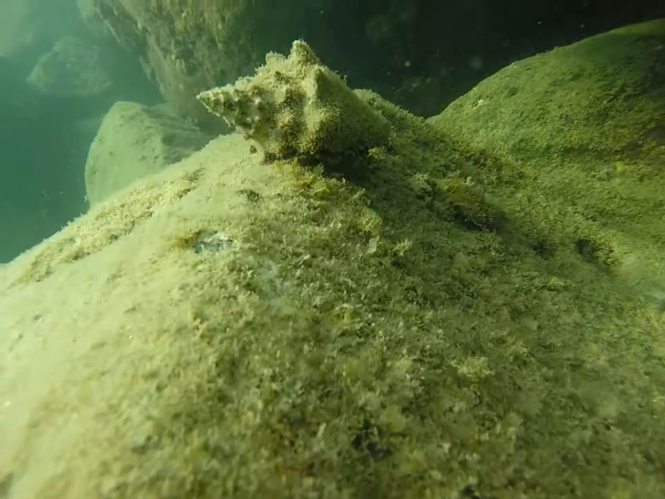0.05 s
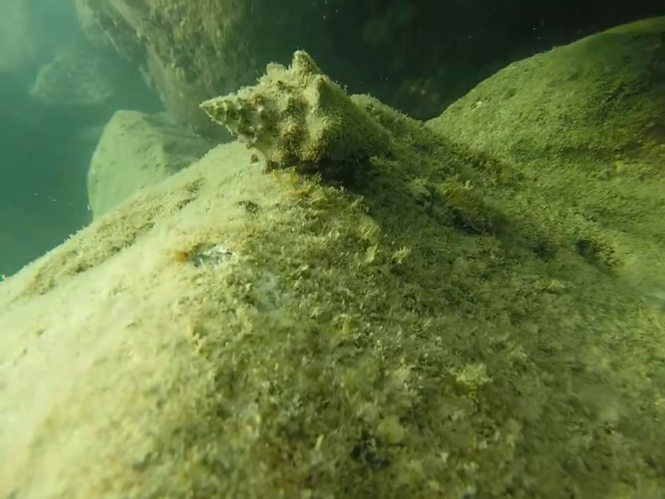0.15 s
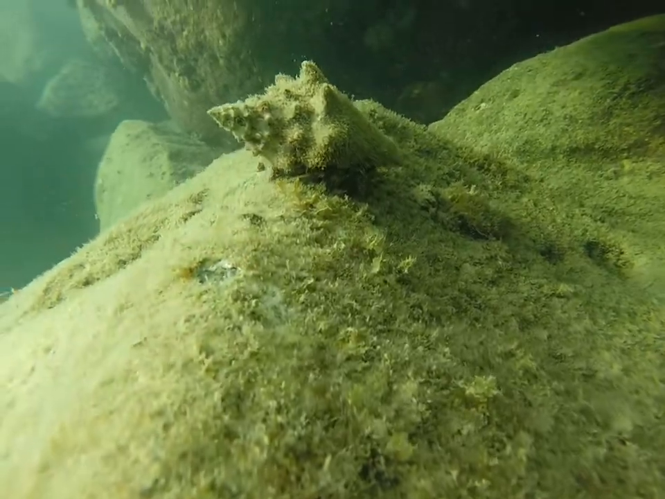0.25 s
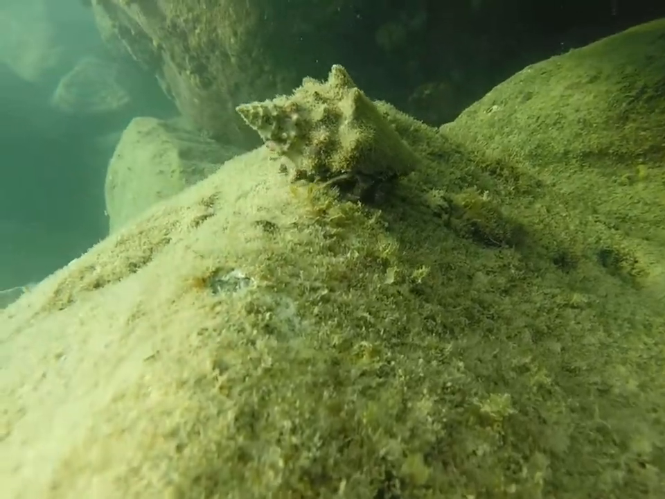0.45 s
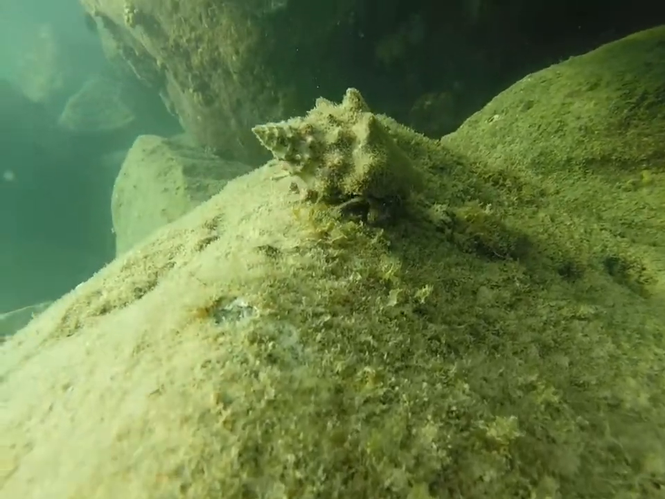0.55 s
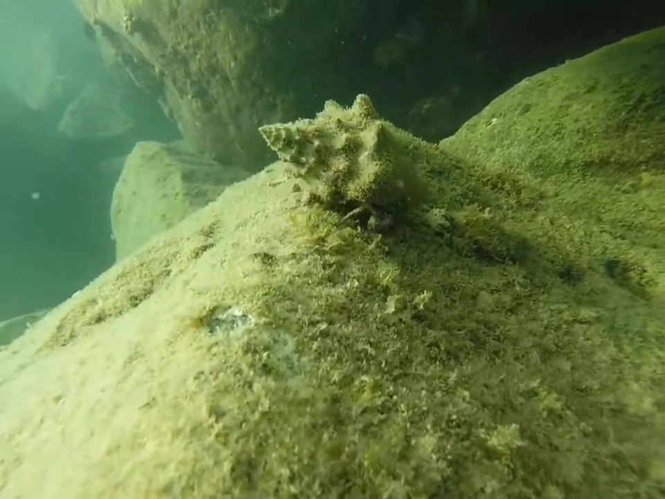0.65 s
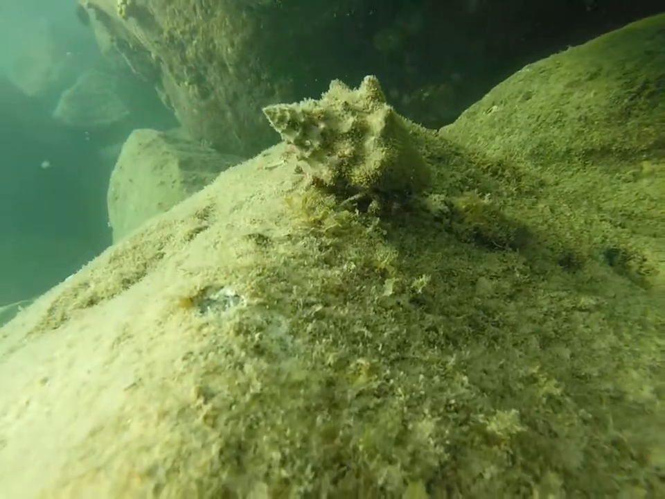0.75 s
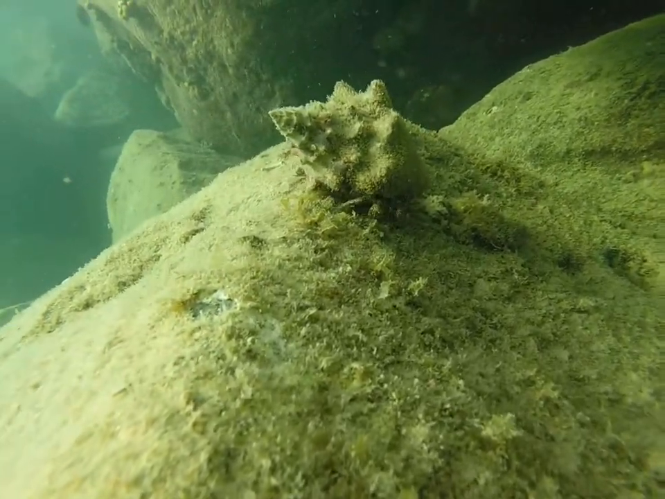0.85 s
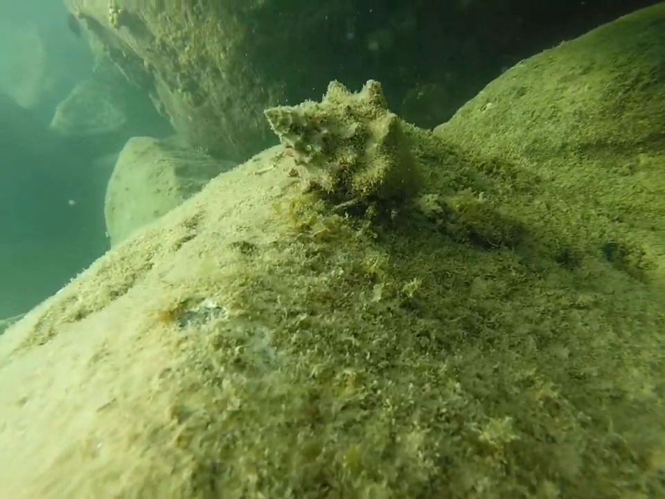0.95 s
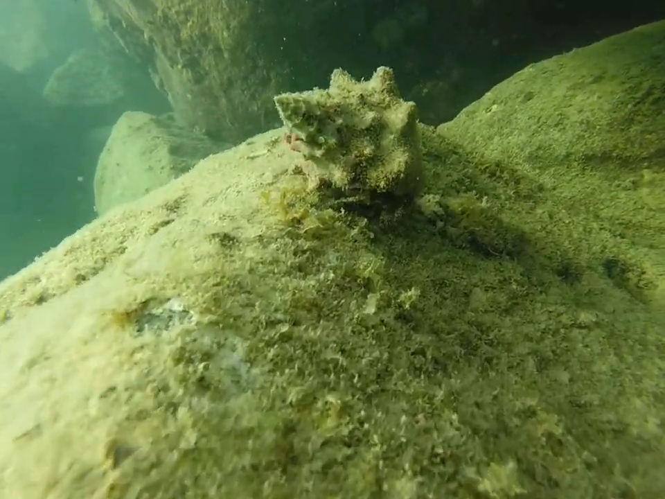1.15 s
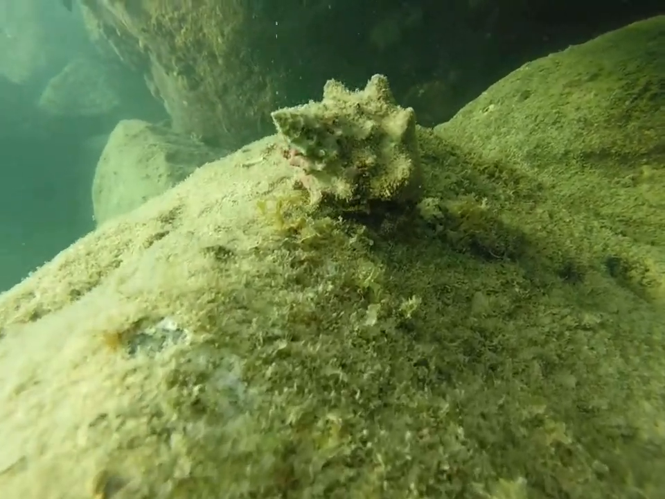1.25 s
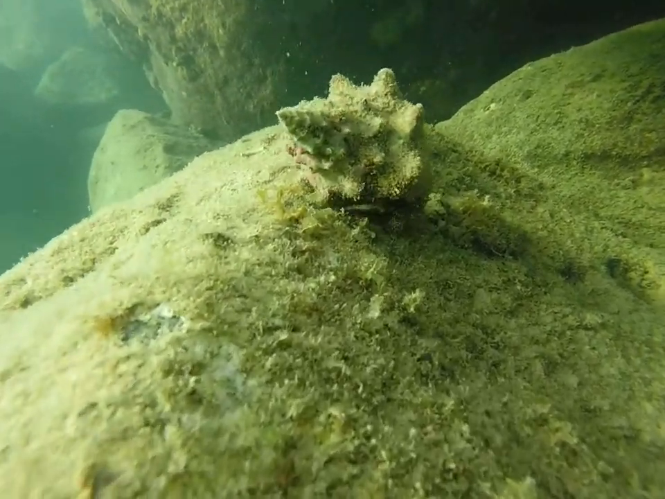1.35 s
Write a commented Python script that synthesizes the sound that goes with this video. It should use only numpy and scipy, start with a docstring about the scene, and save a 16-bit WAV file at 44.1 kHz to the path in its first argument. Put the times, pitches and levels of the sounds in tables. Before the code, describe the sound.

A shell knocks dully on a rock underwater, with small clicks and faint crackle.

```python
"""A conch shell rocks on a boulder under shallow water, heard from inside a camera housing.
Two dull knocks, soft bumps and bubble-like blips of water ring the housing; the shell's hard lip clacks.
Sharp snaps, probably shrimp and grit, ring the housing's wall, and sand grinds softly now and then.
Behind them lie a fine crackle of distant snaps and the faint rumble and burble of moving water."""
import sys
import numpy as np
from scipy import signal
from scipy.fft import rfft, irfft, next_fast_len
from scipy.io import wavfile

SR = 44100
rng = np.random.default_rng(int(sys.argv[2]) if len(sys.argv) > 2 else 0)


def unload_audio(sound):
    """Save the sound as a 16-bit wav file, at the path given as the first command line argument."""
    columns = np.transpose(np.atleast_2d(sound))
    # keep every value between -1 and 1, then stretch to whole-number steps
    steps = np.round(np.clip(columns, -1, 1) * 32767)
    wavfile.write(sys.argv[1], SR, steps.astype(np.int16))


N = 61739
T = np.arange(N) / SR

# dull knocks, soft bumps and bubble-like blips of water:
# (time [s], level [dB], pitch [Hz], attack [s], housing drive [dB])
KNOCKS_AND_BLIPS = [(.071, -47, 252.7, 0.0032, -52.5), (0.129, -33.5, 336, .004, -61),
                    (.160, -39, 620, 0.0034, -66), (0.2405, -13, 306.3, 0.0063, -21.5),
                    (0.2493, -20.5, 323, 0.0051, -40), (0.263, -29, 146, 0.0065, -63),
                    (0.2791, -27.5, 244, 0.0038, -34), (.289, -28.5, 269, 0.008, -35),
                    (.302, -35, 290, 0.0074, -41.5), (0.3257, -25, 544, .004, -27),
                    (.329, -23.5, 132, 0.013, -53), (0.3282, -11.5, 211.8, .012, -35.5),
                    (.344, -17.5, 355, 0.0037, -28), (.364, -28, 191, 0.0078, -40),
                    (0.4496, -25, 606, 0.0039, -51.5), (.469, -39, 620, 0.0028, -68),
                    (.518, -44, 600, 0.0041, -73), (.587, -42.5, 524, .008, -53.5),
                    (.617, -39.5, 574, 0.0027, -71), (0.659, -39.5, 154, 0.0043, -56),
                    (.668, -41, 588, 0.004, -61), (.683, -39, 596, 0.0049, -58),
                    (0.75, -30, 294, 0.0016, -49), (.772, -33, 319, 0.0045, -64),
                    (.784, -33.5, 354, 0.0044, -56), (0.798, -39, 325, 0.0054, -64),
                    (.824, -42.5, 580, 0.0034, -52), (.848, -41.5, 590, 0.0068, -75),
                    (.865, -43, 528, 0.0035, -55.5), (.882, -31, 139, 0.0044, -60),
                    (.907, -37, 163, 0.0047, -78), (1.101, -37.5, 354, 0.0072, -64),
                    (1.193, -47, 572, 0.005, -57), (1.237, -41.5, 355, 0.0031, -58),
                    (1.366, -37.5, 297, 0.0063, -73)]
# the housing's boxy low modes: (frequency [Hz], gain [dB], decay to -60 dB [s])
HOUSING_MODES = [(133, -4, 0.068), (221, 3, 0.055), (342, -6.5, 0.097), (448, 6, 0.031), (606, -8, 0.039),
                 (660, -8, 0.03), (773, -2, 0.036), (910, -11.5, 0.045)]


def knocks_and_blips():
    """Each knock, bump or water blip swells and dies within a few cycles; its onset rings the housing."""
    tones, onsets = np.zeros(N), np.zeros(N)
    for start, db, hz, attack_s, drive_db in KNOCKS_AND_BLIPS:
        age = np.maximum(T - start, 0)
        tones += from_db(db) * swell(age, attack_s, shape=2.83) * np.sin(2 * np.pi * hz * age)
        onsets[int(start * SR)] += from_db(drive_db)
    body = sum((-1) ** k * from_db(db) * ring(onsets, hz, t60)   # modes alternate in polarity
               for k, (hz, db, t60) in enumerate(HOUSING_MODES))
    dull_body = cut(body, 955, "low", order=8)
    return cut(tones + dull_body, 91, "high", order=2)


# hard shell-on-rock clacks: (time [s], level [dB], pitch [Hz], attack [s])
CLACKS = [(.051, -45.5, 1480, 0.0033), (0.2403, -43, 1490, 0.0022), (.3293, -20.5, 2970, 0.0011),
          (.5192, -43, 1700, 0.002), (0.8245, -25, 3220, 0.0014)]
# the shell's partials: (frequency [ratio to pitch], gain [dB])
SHELL_PARTIALS = [(.48, -25), (.85, -15.5), (0.998, -1), (1.32, -16)]


def shell_clacks():
    """The shell's hard lip meets the rock and rings for a few milliseconds."""
    clacks = np.zeros(N)
    for start, db, hz, attack_s in CLACKS:
        age = np.maximum(T - start, 0)
        tone = sum(from_db(partial_db) * np.sin(2 * np.pi * hz * ratio * age)
                   for ratio, partial_db in SHELL_PARTIALS)
        clacks += from_db(db) * swell(age, attack_s, shape=1.74) * tone
    return clacks


# close snaps and how hard they drive each register of the wall:
# (time [s], tap [dB], ring [dB], crack [dB], sizzle [dB], decay [s])
SNAPS = [(0.024, -52.5, -55.5, -60.5, -63, 0.0013), (0.0486, -69, -54, -72, -78, 0.0026),
         (.0992, -59, -57, -71, -82, 0.0017), (.126, -75, -56, -68, -62.5, .0015),
         (0.1876, -60, -49.5, -67, -51.5, 0.0015), (0.2035, -64, -46.5, -50, -54.5, 0.00021),
         (0.237, -58, -49, -67, -68, 0.0018), (0.2808, -53.5, -50, -68, -61, 0.0028),
         (0.297, -54, -55, -56, -62, 0.0043), (0.3285, -49, -33, -43, -43.5, 0.00072),
         (0.353, -51.5, -53, -68, -84, 0.0018), (0.3588, -63, -53, -64, -69, 0.0011),
         (0.3711, -55, -45, -44, -48, 0.001), (0.4, -57.5, -47, -71, -66, 0.00076),
         (0.422, -78, -57.5, -57, -62, 0.0021), (0.49, -67, -57.5, -57.5, -50, 0.00059),
         (0.535, -71, -53, -64, -68, .0022), (0.549, -51, -53, -60.5, -62.5, 0.0022),
         (0.616, -62, -59, -58, -71, 0.0025), (0.725, -59, -53, -50.5, -61, 0.0032),
         (0.8255, -43.5, -38, -51, -52.5, 0.0011), (0.897, -53.5, -51.5, -62, -65, 0.0042),
         (0.9702, -53.5, -49.5, -58, -72, 0.0043), (1.051, -86, -59, -57.5, -70, 0.0046),
         (1.107, -59, -66, -58, -58.5, 0.0033), (1.156, -81, -70, -66, -60, 0.00049),
         (1.278, -73, -54, -71, -64, 0.0015), (1.2958, -54.5, -50, -60, -65.5, 0.0024),
         (1.33, -53.5, -50.5, -47, -59.5, .0018), (1.348, -63, -54.5, -63, -78, 0.0019)]
# the wall's high modes, from hollow tap to bright sizzle: (frequency [Hz], width [Hz], gain [dB])
TAP_MODES = [(1514, 75, 0), (1730, 120, -1.5), (2190, 200, -2)]
RING_MODES = [(2690, 82, -0.5), (2967, 250, 0), (3217, 98, -3)]
CRACK_MODES = [(4266, 130, 7.5), (4923, 410, 2.5), (5940, 540, -4.5)]
SIZZLE_MODES = [(7300, 490, 5), (8150, 1000, 0), (9100, 300, -8), (10200, 590, -18.5), (12000, 1100, -17)]


def snaps():
    """Each snap is a tight pulse with a tail of scatter off the rocks; it rings four wall registers."""
    tail_db, tail_decay_s = -25.5, 0.013
    drives = np.zeros((4, N))
    for start, *drives_db, decay_s in SNAPS:
        age = np.maximum(T - start, 0)
        attack = np.sqrt(np.minimum(age / decay_s, 1))
        tail = from_db(tail_db) * np.exp(-age / tail_decay_s)
        pulse = attack * (np.exp(-age / decay_s) + tail)
        pulse /= np.sqrt(np.sum(pulse ** 2) / (.01 * SR))   # the energy of 10 ms at unit power
        drives += np.outer(from_db(drives_db), pulse)
    polarities = rng.choice([-1., 1.], (4, N))
    registers = (TAP_MODES, RING_MODES, CRACK_MODES, SIZZLE_MODES)
    return sum(housing_wall(drive, modes) for drive, modes in zip(drives * polarities, registers))


# soft scrapes of sand: (time [s], length [s], level [dB])
SCRAPES = [(0.526, 0.015, -54), (1.055, 0.022, -56), (1.24, 0.077, -78)]


def sand_scrapes():
    """Sand grinds in brief arcs of grainy noise that ring the wall softly."""
    envelope = np.zeros(N)
    for start, length_s, db in SCRAPES:
        position = 2 * (T - start) / length_s - 1   # -1 to 1 across the scrape
        envelope += from_db(db) * np.sqrt(np.maximum(1 - position ** 2, 0))
    grains = rng.laplace(0, np.sqrt(.5), N)
    return housing_wall(envelope * grains, RING_MODES)


# EQ curves of the distant crackle and its even hiss: (frequency [Hz], gain [dB])
CRACKLE_EQ = [(1000, 1), (1500, 8), (2000, 5), (2900, 6), (3700, -0.5), (5500, 7), (8000, 2), (11000, -2),
              (13500, -20), (15500, -35)]
HISS_EQ = [(700, 5), (1000, 4.5), (1250, 0), (1600, 1.5), (2000, -2), (2700, 1.5), (3600, -4.5),
           (5000, -4.5), (6500, -11), (7800, -3), (10000, -17.5), (13500, -18.5), (15500, -33)]
# where the hiss rings in the wall: (frequency [Hz], width [Hz], level [dB])
WALL_TONES = [(3223, 120, -61.5), (4046, 74, -68)]


def far_crackle():
    """Distant snaps, each smeared by its path; the farthest merge into a hiss that rings in the wall."""
    snaps_per_s, spread_db, smear_s = 260, 3.0, 0.0011
    crackle_db, hiss_db = -63.5, -57.5
    sizes = from_db(spread_db * np.minimum(rng.exponential(1, N), 3.5))
    triggers = rng.random(N) < snaps_per_s / SR
    power = signal.lfilter([1], [1, -np.exp(-1 / (smear_s * SR))], sizes ** 2 * triggers + 1e-18)
    grains = np.sqrt(power) * rng.standard_normal(N)
    crackle = unit_power(equalise(grains, CRACKLE_EQ))
    wall_tones = sum(from_db(db) * unit_power(resonance(rng.standard_normal(N), hz, width))
                     for hz, width, db in WALL_TONES)
    return from_db(crackle_db) * crackle + from_db(hiss_db) * noise(HISS_EQ) + wall_tones


# EQ curves of the water's deep rumble and its burble: (frequency [Hz], gain [dB])
RUMBLE_EQ = [(15, -6.5), (26, -5.5), (36, 3), (48, -14), (65, -17), (120, -24.5), (300, -69)]
BURBLE_EQ = [(80, 4.5), (160, 0.5), (300, 2.5), (430, -3.5), (580, 5.5), (700, -3), (900, -12.5),
             (1300, -46)]
# fader moves of the two water layers: (time [s], level [dB])
RUMBLE_FADER = [(0, -43), (.09, -41.5), (.18, -48), (.3, -40), (.42, -44), (.52, -40.5), (.68, -40.5),
                (.74, -48), (.86, -39.5), (.92, -41), (1.04, -41), (1.1, -46.5), (1.4, -44.5)]
BURBLE_FADER = [(0, -48.5), (.1, -55.5), (.19, -48), (.42, -54.5), (.55, -52), (.68, -54), (.73, -51.5),
                (.9, -51), (1.0, -63.5), (1.15, -56.5), (1.23, -53), (1.4, -53.5)]


def water():
    """Water sways against the housing and burbles around it."""
    rumble = fader(RUMBLE_FADER) * noise(RUMBLE_EQ)
    burble = fader(BURBLE_FADER) * noise(BURBLE_EQ)
    return rumble + burble


def housing_wall(drive, modes):
    """One register of the wall's high modes, ringing side by side at unit power gain."""
    skirt_ratio = 1.143   # the register rolls off this far beyond its outer modes
    band_hz = [modes[0][0] / skirt_ratio, min(modes[-1][0] * skirt_ratio, .45 * SR)]
    drive_and_click = np.stack([drive, signal.unit_impulse(N)])
    ringing = sum(from_db(db) * resonance(drive_and_click, hz, width) for hz, width, db in modes)
    sound, click_response = cut(ringing, band_hz, "band", order=2)
    return sound / np.sqrt(np.sum(click_response ** 2))


def swell(age, attack_s, shape):
    """Envelope that peaks at 1 after attack_s; a higher shape makes it tighter and more symmetric."""
    return (age / attack_s * np.exp(1 - age / attack_s)) ** shape


def from_db(db):
    """Decibels to gain."""
    return 10 ** (np.asarray(db) / 20)


def unit_power(x):
    """Scale to an RMS of 1."""
    return x / np.sqrt(np.mean(x ** 2) + 1e-20)


def fader(points):
    """Gain over time through (time [s], level [dB]) points."""
    return from_db(np.interp(T, *np.transpose(points)))


def equalise(x, curve):
    """Minimum-phase EQ of unit power gain, shaped by (frequency [Hz], gain [dB]) points."""
    size = next_fast_len(2 * N)
    hz, db = np.transpose(curve)
    bin_hz = np.arange(size // 2 + 1) * SR / size
    gain = from_db(np.interp(np.log(bin_hz + 1), np.log(hz), db))
    cepstrum = irfft(np.log(unit_power(gain)), size)
    cepstrum[1:size // 2] *= 2   # folded forward in time, so nothing rings ahead of a transient
    cepstrum[size // 2 + 1:] = 0
    return irfft(rfft(x, size) * np.exp(rfft(cepstrum)), size)[:N]


def noise(curve):
    """Noise of unit power, coloured by an EQ curve."""
    return unit_power(equalise(rng.standard_normal(N), curve))


def resonance(x, hz, width_hz):
    """Band-pass with a peak gain of 1."""
    radius, angle = np.exp(-np.pi * width_hz / SR), 2 * np.pi * hz / SR
    feedback = [1, -2 * radius * np.cos(angle), radius ** 2]
    return signal.lfilter(np.array([1, 0, -1]) * (1 - radius ** 2) / 2, feedback, x + 1e-18)


def ring(clicks, hz, t60):
    """A unit click starts a sine of height 1 that falls 60 dB in t60 seconds."""
    radius, angle = np.exp(-np.log(1000) / (t60 * SR)), 2 * np.pi * hz / SR
    feedback = [1, -2 * radius * np.cos(angle), radius ** 2]
    return signal.lfilter([0, np.sin(angle)], feedback, clicks + 1e-18)


def cut(x, hz, kind, order):
    """Butterworth low-, high- or band-pass."""
    return signal.sosfilt(signal.butter(order, hz, kind, fs=SR, output="sos"), x)


def scene():
    """Mono mix: knocks and clacks up front, then blips, snaps and sand, over crackle and water."""
    return (knocks_and_blips() + shell_clacks() + snaps() + sand_scrapes() + far_crackle() + water())[None]


def record(dry):
    """A steep high cut takes off the very top."""
    cutoff_hz = 15500
    return signal.sosfilt(signal.ellip(10, .1, 80, cutoff_hz, fs=SR, output="sos"), dry)


dry = scene()
out = record(dry)
unload_audio(out)
```